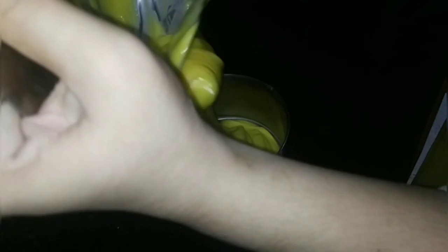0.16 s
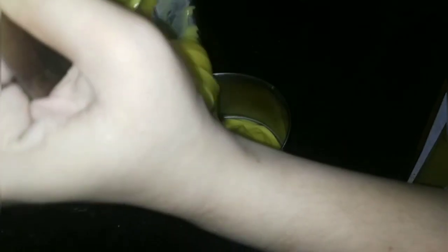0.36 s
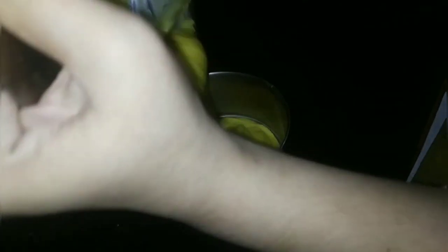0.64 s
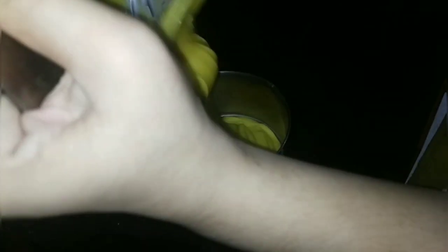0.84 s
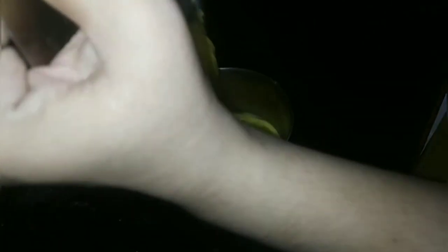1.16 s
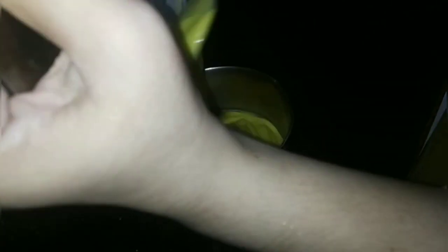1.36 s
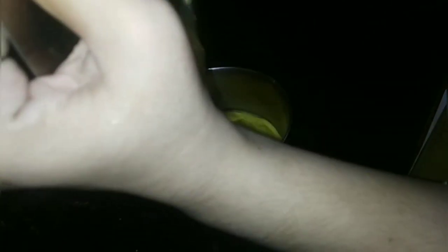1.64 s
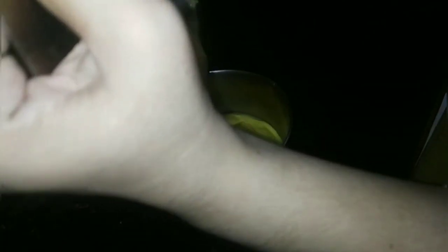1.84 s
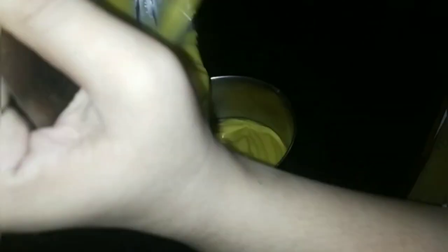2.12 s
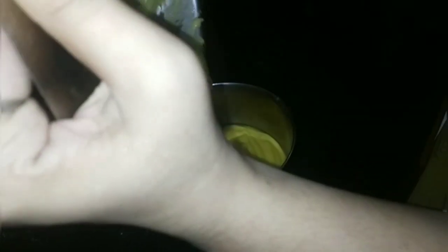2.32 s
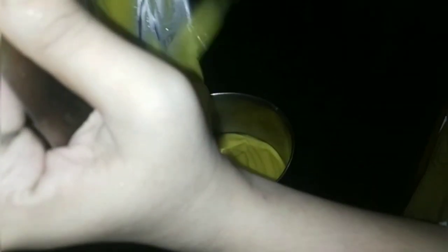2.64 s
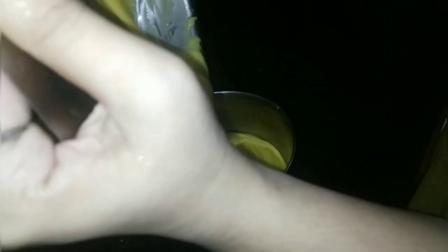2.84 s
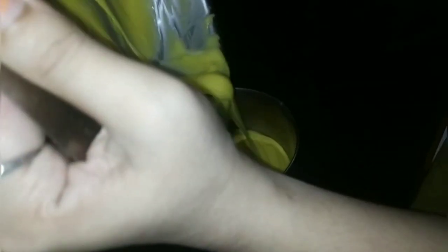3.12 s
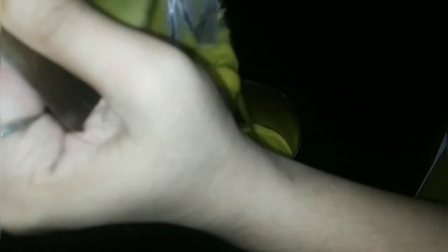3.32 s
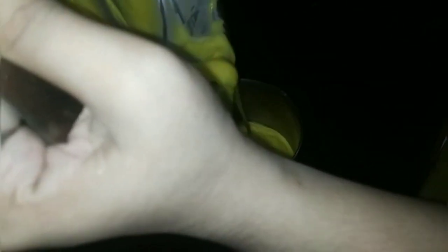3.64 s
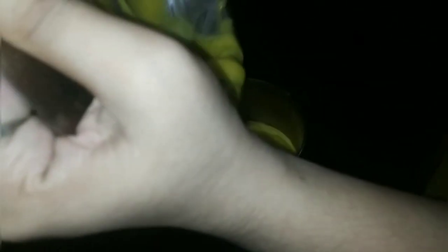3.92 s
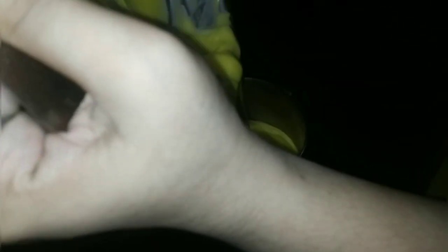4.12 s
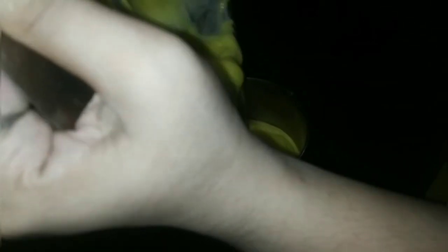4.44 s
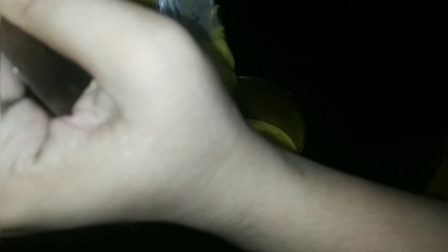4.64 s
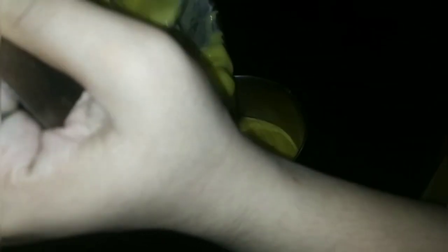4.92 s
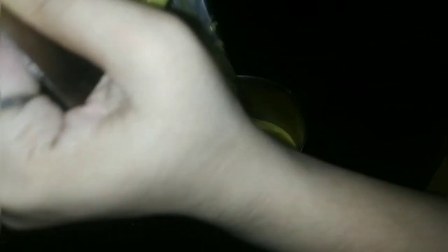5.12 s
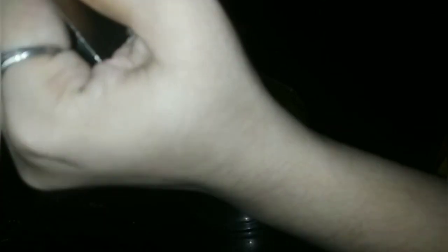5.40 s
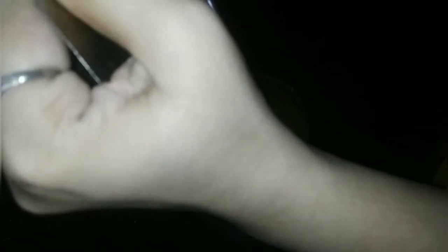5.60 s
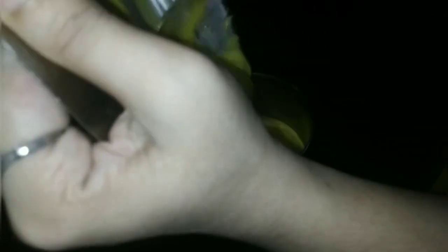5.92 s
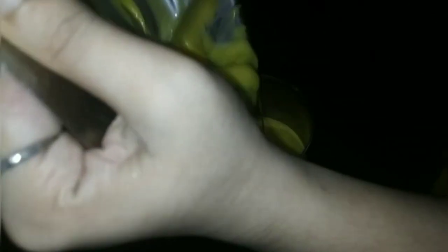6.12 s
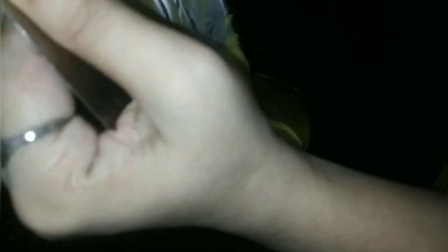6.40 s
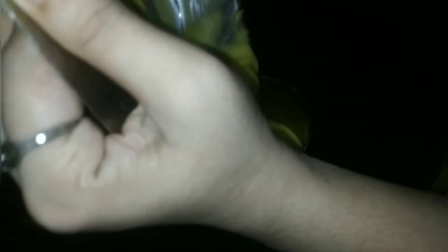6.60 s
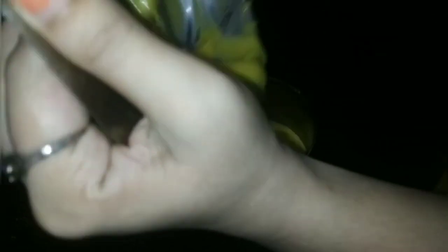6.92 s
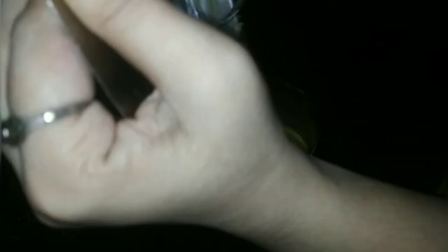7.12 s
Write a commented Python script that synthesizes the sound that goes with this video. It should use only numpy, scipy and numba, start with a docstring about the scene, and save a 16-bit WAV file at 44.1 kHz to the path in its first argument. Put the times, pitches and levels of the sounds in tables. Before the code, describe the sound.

A low, steady motor hum near 290 Hz runs throughout with a very faint thin whine, soft air noise and a low rumble, strongest at the start and again around 3.6 seconds before fading. Close up, a spatula touches a glass container dully at 0.1 and makes a short scrape. A hard, bright rim knock at 0.74 leaves the glass ringing briefly; soft scrapes follow at 0.8, 1.4 and 2.1. Another hard knock rings at 2.6, then a faint long scrape. From 3.2 to 3.7 stronger wet, gritty strokes hiss, ending in a soft pat. A knock lands at 4.0, with quick clinks and thuds from 4.2 to 5.1 among short scrapes. Longer tearing, sticky strokes run from 5.6 to 6.3. Damped knocks cluster around 6.6 to 6.8 with a firm scrape, then a final sharp clink at 7.1 and a last trailing scrape. Short kitchen echo.

```python
"""A motor hums and whines steadily in a small kitchen, over air noise and a low rumble that swells and fades.
A spatula soon knocks on a glass container, then scrapes out thick cake batter, stroke after stroke.
Each stroke is a wet hiss of tearing film over the container's rubbed resonances; knocks are damped rings.
The two hardest knocks leave the glass singing, and a few soft pats fall in between and after.
Motor tones are sines, rings are fading sines, and rubbing, hiss, air and rumble are shaped noise."""
import sys
import numpy as np
from scipy import signal
from scipy.fft import rfft, irfft
from scipy.io import wavfile
from numba import njit

SR = 44100
rng = np.random.default_rng(int(sys.argv[2]) if len(sys.argv) > 2 else 0)


def unload_wav(signal):
    """Save mono or channel-first audio to the path in sys.argv[1] as 16-bit WAV at rate SR, clipped to [-1, 1]."""
    wavfile.write(
        sys.argv[1],
        SR,
        np.round(np.clip(np.atleast_2d(signal).T, -1, 1) * 32767).astype(np.int16),
    )


N = 320166
TIME = np.arange(N) / SR  # seconds

# Steady tones of the motor shaft. Each row: multiple of the shaft rate, level in dB rms.
MOTOR_HUM = [(6, -44.5), (7, -67.5), (9, -68)]
# Magnetic whine of the rotor slots, sidebands one turn apart. Each row: pitch in Hz, level in dB rms.
SLOT_WHINE = [(2284.5, -76.5), (2333, -75), (2381.5, -80.5), (2430.4, -73), (2479, -65), (2527.6, -84)]
SHAFT_HZ = 48.58  # turns per second

# Colour of the air noise. Each row: frequency in Hz, level in dB per Hz.
AIR_COLOUR = [(20, -81), (50, -85.5), (100, -92), (160, -99), (270, -85), (450, -87.5), (620, -94.5),
              (900, -96), (1250, -99), (2000, -100), (2450, -119.5), (3000, -111), (3700, -110),
              (4800, -119), (6500, -120), (9000, -131), (13000, -137)]
# Swells of the low rumble. Each row: time in seconds, level in dB before one overall lift.
RUMBLE_SWELLS = [(0.0, -55), (0.36, -66), (1.21, -61.5), (1.92, -63.5), (3.58, -53.5), (4.85, -74),
                 (7.04, -74), (7.26, -80)]
# Colour of the rumble. Each row: frequency in Hz, relative level in dB per Hz.
RUMBLE_COLOUR = [(30, -6.5), (60, -7.5), (76, -8), (89, 11.5), (103, -1.5), (119, 1), (142, -7), (165, 0.5),
                 (200, -10.5), (400, -56.5)]

# Single tones set off by the hard edge of the blade. Each row: time in seconds, level in dB, pitch in Hz.
EDGE_PINGS = [(0.071, -38.5, 1179), (0.741, -36, 2630), (2.594, -39, 2700), (2.594, -32, 1570),
              (3.986, -26.5, 2620), (4.21, -31.5, 1583), (4.864, -28, 2346), (4.864, -34.5, 1138),
              (5.647, -28, 1575), (6.592, -26, 658), (6.592, -30, 1592), (7.115, -28, 1185),
              (7.114, -29, 1510)]
PING_T60 = 0.071  # seconds to fade by 60 dB

# Knocks of the spatula. Each row: time in seconds, spot on the container, basic level in dB,
# hardness in dB per octave, level of the contact tick in dB.
SPATULA_KNOCKS = [(0.072, "shoulder", -48, -2, -61), (0.74, "rim", -30.5, 0.1, -54),
                  (2.593, "rim", -31, 0.3, -46), (3.986, "shoulder", -37.5, 0.9, -49.5),
                  (4.195, "shoulder", -46.5, 0.7, -68), (4.21, "rim", -39.5, 1.5, -67),
                  (4.425, "shoulder", -40, 0.3, -59.5), (4.563, "bottom", -34.5, 0, -52),
                  (4.863, "wall", -34.5, 1, -57), (5.092, "wall", -46, 0, -78),
                  (5.538, "wall", -40, 1, -75), (5.646, "wall", -42, 4.5, -57),
                  (6.591, "wall", -43.5, 2, -55), (6.691, "bottom", -37.5, -2.3, -56),
                  (6.773, "wall", -42.5, -0.7, -72), (7.114, "shoulder", -40, 3, -47)]
# The hand-held container's ringing tones, one list per family from thud to clink.
# Each row: pitch in Hz, relative level in dB when knocked, time to fade by 60 dB in seconds.
CONTAINER_MODES = [
    [(258.5, 0, 0.049)],
    [(317.4, -3.5, 0.091)],
    [(483, -1.5, 0.059), (636, 9.5, 0.02), (716.4, 2, 0.044)],
    [(854, 0, 0.031), (944, -1, 0.051), (1003, -26, 0.069)],
    [(1150, 0.5, 0.041), (1181, -1, 0.031), (1333, -5, 0.038)],
    [(1454, 1.5, 0.032), (1575, -2, 0.065), (1685, -1.5, 0.075), (1877, -2, 0.044)],
    [(2094, -5, 0.022), (2248, 4, 0.034), (2446, 4.5, .028), (2683, -1, 0.019)],
]
# How strongly a knock at each spot wakes the families. Each row: one level in dB per family, thud to clink.
SPOT_LEVELS = {"rim": (-9.5, -17, -6.5, 1, -20, -10.5, -10), "shoulder": (-2, -5, 1, -1.5, -4, -6, -5),
               "wall": (-26, 4.5, -4, -24.5, -5, -5.5, -7.5),
               "bottom": (-30, -13, -0.5, -1, -8.5, -27, -13)}
# Colour of the contact tick. Each row: frequency in Hz, relative level in dB per Hz.
TICK_COLOUR = [(1500, -15.5), (2900, -5), (3600, -0.5), (5700, 8), (7500, 0), (9500, -2.5), (13000, -8),
               (15000, -19)]
PIVOT_HZ = 800  # hardness leaves the level unchanged at this pitch

# Strokes: pressure swells to its firmest moment, then eases, while the blade's resonance slides.
# Each row: start, firmest moment and end in seconds, swell in dB,
# levels of low rubbing, high rubbing and wet hiss in dB before trims, share of bright tearing from 0 to 1,
# blade resonance in Hz at the start and at the end, air gap resonance in Hz when firmest.
SPATULA_STROKES = [(0.139, 0.23, 0.24, 4, -54, -57, -67.5, .5, 1960, 2000, 5520),
                   (0.759, 0.80, 0.91, 9.5, -57, -59.5, -71, .4, 2030, 2010, 5500),
                   (1.33, 1.44, 1.556, 12.5, -58, -60.5, -68, 0.4, 2020, 1990, 5500),
                   (2.004, 2.06, 2.15, 20, -55.5, -56.5, -58, .6, 2020, 2000, 5530),
                   (2.108, 2.16, 2.38, 14, -59, -61.5, -73, 0.4, 2000, 1955, 5370),
                   (2.644, 2.77, 3.08, 6, -61, -64.5, -79, 0.3, 1990, 2020, 5400),
                   (3.194, 3.34, 3.38, 7, -53.5, -55.5, -64.5, 0.2, 2040, 1940, 5320),
                   (3.378, 3.43, 3.576, 6, -54, -51, -55.5, 0.8, 2350, 2180, 5530),
                   (3.529, 3.643, 3.68, 4, -47.5, -45, -52, .5, 2020, 1860, 5630),
                   (4.012, 4.035, 4.045, 3, -54, -53, -58, .7, 2170, 2140, 5320),
                   (4.063, 4.072, 4.185, 2.5, -54, -54.5, -52.5, 1, 2100, 1900, 5750),
                   (4.491, 4.55, 4.63, 3, -47, -44, -50.5, 0.4, 1780, 2030, 5650),
                   (4.634, 4.66, 4.88, 12, -57, -52.5, -66, 0, 2300, 2080, 4840),
                   (4.938, 4.99, 5.08, 5, -50, -53.5, -51, .75, 2000, 1860, 5460),
                   (5.343, 5.37, 5.51, 6.5, -74, -73, -76, 0, 1790, 1690, 5300),
                   (5.618, 5.78, 5.91, 7, -55, -49.5, -57.5, 0.8, 1530, 1630, 5250),
                   (5.87, 6.04, 6.14, 6.5, -55, -50.5, -52, 1, 1850, 1585, 6200),
                   (6.144, 6.19, 6.31, 8.5, -56.5, -52.5, -58.5, .9, 2035, 2270, 5860),
                   (6.628, 6.669, 6.776, 5, -47, -52.5, -48.5, 0.78, 1690, 1384, 6080),
                   (7.005, 7.014, 7.02, 6, -52, -68, -75.5, .4, 1500, 1490, 5360),
                   (7.043, 7.097, 7.115, 2, -68, -63, -59, .3, 1520, 1500, 5300),
                   (7.161, 7.204, 7.5, 0.5, -51.5, -53, -59, 0.3, 1510, 1610, 5110)]
# Faint steady rubbing and hiss beneath all strokes, keeping the levels finite.
# One row: levels of low rubbing, high rubbing and wet hiss in dB before trims.
FLOOR_LEVELS = (-67, -73.5, -89.5)
# Colours of low rubbing, high rubbing and hiss. Each row: frequency in Hz, relative level in dB per Hz.
LOW_RUB_COLOUR = [(200, -28.5), (330, -2.5), (520, -2), (680, 0.5), (790, 11.5), (920, 1), (1150, -6.5),
                  (1400, -25), (2000, -46)]
HIGH_RUB_COLOUR = [(800, -28.5), (1250, -7), (1570, -1.5), (1950, -6), (2250, -1), (2600, 1), (3100, -7),
                   (4200, -14), (8000, -51)]
HISS_COLOUR = [(1200, -22), (2600, -2), (3500, -16.5), (4600, 3.5), (5800, 4.5), (7400, 1), (9200, 3.5),
               (10400, 0), (12000, -1), (13000, 1)]
RUB_FOLLOWS = 0.93  # share of the hiss's swing in dB that the rubbing follows
ATTACK_DB_PER_S, RELEASE_DB_PER_S = 701.5, 479  # how fast the blade lands and lifts
GAP_HZ_PER_DB = 111  # pressure narrows the air gap under the blade, so its resonance rises

# The two hardest knocks, which leave the glass singing. Each row: time in seconds, level in dB.
SINGING_KNOCKS = [(.740, -41), (2.593, -40)]
# Tones of the singing glass. Each row: pitch in Hz, relative level in dB, time to fade by 60 dB in seconds.
GLASS_TONES = [(800, -5.5, 0.26), (840, -14.5, .35), (942, -9, 0.5), (1002, -1, 0.21), (1556, -10, 0.45),
               (1540, -7.5, 0.49), (1745, -12, 0.32), (2660, -6.5, .16), (2890, -18, .1)]
# Soft pats of blade and batter on the wall.
# Each row: time in seconds, level in dB, pitch in Hz, time to fade by 60 dB in seconds.
SOFT_PATS = [(1.420, -51.5, 880, 0.048), (3.019, -61.5, 1486, .08), (3.66, -44, 982.6, 0.096),
             (5.784, -56.5, 230, 0.04), (5.822, -53, 2076, 0.043)]
# How long the room's echo lasts. Each row: frequency in Hz, time to fade by 60 dB in seconds.
ECHO_T60 = [(200, 0.5), (900, 0.47), (2500, 0.57), (6000, 0.21), (12000, 0.11)]
CUTOFF_HZ = 13100  # top of the recorder's range


def from_db(db):
    """Turn decibels into a plain factor."""
    return 10 ** (np.asarray(db) / 20)


def rms_one(x):
    """Scale a sound to an rms level of 1."""
    return x / np.sqrt(np.mean(x ** 2) + 1e-20)


def at_hz(points, hz):
    """Read a table on a log-frequency axis."""
    f, value = np.transpose(points)
    return np.interp(np.log(np.maximum(hz, 1)), np.log(f), value)


def colour(x, spectrum):
    """Give a noise the stated spectrum."""
    n = x.shape[-1]
    gain = from_db(at_hz(spectrum, np.fft.rfftfreq(n, 1 / SR)))
    return irfft(rfft(x) * gain, n)


def tilted(spectrum, db_per_octave):
    """Tilt a spectrum to make it brighter or duller."""
    return [(hz, db + db_per_octave * np.log2(hz)) for hz, db in spectrum]


def drift(rate):
    """Random wandering with rms 1, changing course `rate` times a second."""
    knots = rng.standard_normal(4096)
    return rms_one(np.interp(TIME * rate, np.arange(len(knots)), knots))


def band(x, low_hz, high_hz):
    """Keep the part of a sound between two frequencies."""
    return signal.sosfilt(signal.butter(2, [low_hz, high_hz], "band", fs=SR, output="sos"), x)


def add(track, s, sound):
    """Lay a sound into the track at time s."""
    at = int(s * SR)
    track[at:at + len(sound)] += sound[:N - at]


def ring(hz, t60, t):
    """A sine that fades by 60 dB in t60 seconds."""
    return np.sin(2 * np.pi * hz * t) * from_db(-60 * t / t60)


def blow(x, db):
    """Scale a short sound so that its energy, spread over 20 ms, has this level."""
    return from_db(db) * x * np.sqrt(.02 * SR / np.sum(x ** 2))


@njit
def sweep(x, angle, radius):
    """A two-pole resonance whose centre moves."""
    y = np.zeros(len(x))
    for i in range(2, len(x)):
        feedback = 2 * radius * np.cos(angle[i]) * y[i - 1] - radius * radius * y[i - 2]
        y[i] = x[i] - x[i - 2] + feedback
    return y


def resonate(x, centre_hz, width_hz):
    """Pass a sound through a moving resonance and bring it to rms 1."""
    return rms_one(sweep(x, 2 * np.pi * centre_hz / SR, np.exp(-np.pi * width_hz / SR)))


def motor(throb_db=1.52):
    """Harmonics of the shaft and a thin slot whine share one nearly constant speed."""
    turns = 2 * np.pi * np.cumsum(1 + .0003 * drift(3)) / SR
    hum = sum(from_db(db) * np.sin(k * SHAFT_HZ * turns) for k, db in MOTOR_HUM)
    whine = sum(from_db(db + .5 * drift(2.7)) * np.sin(hz * turns) for hz, db in SLOT_WHINE)
    return np.sqrt(2) * (hum * from_db(throb_db * drift(7.9)) + whine)


def air_noise():
    """Steady noise with a known level in each Hz."""
    return colour(rng.standard_normal(N) * np.sqrt(SR / 2), AIR_COLOUR)


def rumble(lift_db=2.0):
    """Low noise that swells and fades."""
    s, db = np.transpose(RUMBLE_SWELLS)
    level_db = np.interp(TIME, s, db) + lift_db
    return from_db(level_db) * rms_one(colour(rng.standard_normal(N), RUMBLE_COLOUR))


def wide_treble(hiss_db, hiss_side_db=-6.0, air_side_db=-20.0, tilt_db_per_octave=1.0):
    """Wide treble: independent noise above 3.4 kHz, opposite in left and right."""
    hiss = rms_one(colour(rng.standard_normal(N), tilted(HISS_COLOUR, tilt_db_per_octave)))
    both = from_db(hiss_db + hiss_side_db) * hiss + from_db(air_side_db) * air_noise()
    side = signal.sosfilt(signal.ellip(10, .5, 90, 3400, "high", fs=SR, output="sos"), both)
    return side * np.array([[1], [-1]])


def edge_pings():
    """The hard edge of the blade makes single tones ping out."""
    out, t = np.zeros(N), TIME[:SR]
    for s, db, hz in EDGE_PINGS:
        add(out, s, from_db(db) * ring(hz, PING_T60, t))
    return out


def knocks(tick_t60=0.02, tick_rise_s=0.00083, rattle=0.44, rattle_t60=0.039):
    """A sharp tick and a ring that hand and batter damp at once, with a little rattle of the blade."""
    out, t = np.zeros(N), TIME[:SR // 5]
    for s, spot, knock_db, hardness, contact_db in SPATULA_KNOCKS:
        for family, spot_db in zip(CONTAINER_MODES, SPOT_LEVELS[spot]):
            low_hz, high_hz = family[0][0], family[-1][0]
            octaves = np.log2(np.sqrt(low_hz * high_hz) / PIVOT_HZ)
            rings = np.zeros(len(t))
            for k, (hz, level, t60) in enumerate(family):
                sign = (-1) ** (k + 1)
                rings += sign * from_db(level + 2 * rng.normal()) * ring(hz, t60, t)
            # keep low-frequency spill of the abrupt sine starts out of the rings
            spill_cut = signal.butter(2, low_hz / np.sqrt(2), "high", fs=SR, output="sos")
            rings = signal.sosfilt(spill_cut, rings)
            burst = rng.standard_normal(len(t)) * from_db(-60 * t / rattle_t60)
            chatter = band(burst, .85 * low_hz, 1.15 * high_hz)
            body = blow(rings, 0) + rattle * blow(chatter, 0)
            add(out, s, blow(body, knock_db + spot_db + hardness * octaves))
        tick_shape = from_db(-60 * t / tick_t60) * (1 - np.exp(-t / tick_rise_s))
        tick = colour(rng.standard_normal(len(t)), TICK_COLOUR) * tick_shape
        add(out, s, blow(tick, contact_db))
    return out


def strokes():
    """Pressure sets levels (dB) and gap resonance (Hz); each stroke brings its tearing share and blade slide."""
    power = from_db(FLOOR_LEVELS)[:, None] ** 2 * np.ones(N)
    weight, tearing, blade_hz, gap_hz = 0, 0, 0, 0
    for (start, firmest, end, swell_db, low_db, high_db, hiss_db, tear,
         from_hz, to_hz, firm_gap_hz) in SPATULA_STROKES:
        pressure_db = np.interp(TIME, [start, firmest, end], [-swell_db, 0, -swell_db])
        landing_db = ATTACK_DB_PER_S * np.maximum(start - TIME, 0)
        lifting_db = RELEASE_DB_PER_S * np.maximum(TIME - end, 0)
        contact = from_db(np.maximum(pressure_db - landing_db - lifting_db, -120))
        rub, hiss = contact ** RUB_FOLLOWS, from_db(hiss_db) * contact
        power += np.array([from_db(low_db) * rub, from_db(high_db) * rub, hiss]) ** 2
        # where strokes overlap, the stronger one counts for more
        weight = weight + contact
        tearing = tearing + np.clip(tear, 0, 1) * hiss ** 2
        blade_hz = blade_hz + contact * np.interp(TIME, [start, end], [from_hz, to_hz])
        gap_hz = gap_hz + contact * (firm_gap_hz + GAP_HZ_PER_DB * pressure_db)
    return *(10 * np.log10(power)), tearing / power[2], blade_hz / weight, gap_hz / weight


def slips(per_s, spread_db, smooth):
    """Tiny random stick-slip clicks of uneven size over smooth friction noise."""
    sizes = from_db(spread_db * np.minimum(rng.exponential(1, N), 4)) * rng.choice([-1, 1], N)
    clicks = rms_one(sizes * (rng.random(N) < per_s / SR))
    return rms_one(clicks + smooth * rng.standard_normal(N))


def rubbing(low_db, high_db, blade_hz, low_trim_db=-4, resonant=0.47, blade_share=0.96, blade_width_hz=260):
    """The blade judders along the wall, waking the container's modes and its own shifting resonance."""
    friction = slips(per_s=700, spread_db=1.5, smooth=0.41) * from_db(2 * drift(70))
    body = np.zeros(SR // 8)
    for family in CONTAINER_MODES:
        for hz, _, t60 in family:  # all modes equally strong here
            body += rng.choice([-1, 1]) * ring(hz, t60, TIME[:SR // 8])
    wall = friction + resonant * rms_one(signal.fftconvolve(friction, body)[:N])
    lower = rms_one(colour(wall, LOW_RUB_COLOUR))
    upper = rms_one(colour(wall, HIGH_RUB_COLOUR))
    blade_slips = colour(slips(per_s=900, spread_db=4.5, smooth=0.47), HIGH_RUB_COLOUR)
    blade = resonate(blade_slips, blade_hz * (1 + 0.02 * drift(35)), blade_width_hz)
    high = rms_one(upper + blade_share * blade)
    return from_db(low_db + low_trim_db) * lower + from_db(high_db) * high


def wet_hiss(hiss_db, tearing, gap_hz, trim_db=-0.1, patchy_db=4.0, flutter_db=2.37,
             whistle_width_hz=170, whistle=.38, tear_tilt_db=1.5):
    """The batter film tears in tiny pops; air gaps under the blade add thin wandering resonances."""
    pops = [slips(per_s=4000, spread_db=2.5, smooth=0.35) for _ in range(2)]
    patches, edges = np.zeros(N), np.geomspace(1800, 15000, 13)
    for k, (low, high) in enumerate(zip(edges, edges[1:])):
        patches += from_db(patchy_db * drift(22)) * band(pops[k % 2], low, high)
    bright = rms_one(colour(patches, tilted(HISS_COLOUR, tear_tilt_db)))
    gaps = np.zeros(N)
    for ratio in (.88, 1.04, 1.25, 1.68):
        centre_hz = ratio * gap_hz * (1 + .05 * drift(16))
        gaps += resonate(rng.standard_normal(N), centre_hz, whistle_width_hz) * from_db(5 * drift(25))
    # where the film slides rather than tears, it is duller
    sliding = rms_one(colour(rng.standard_normal(N), HISS_COLOUR))
    dull = rms_one(signal.sosfilt(signal.butter(2, 6500, fs=SR, output="sos"), sliding))
    film = np.sqrt(tearing) * bright + np.sqrt(1 - tearing) * dull
    wet = rms_one(film + whistle * rms_one(colour(gaps, HISS_COLOUR)))
    return from_db(hiss_db + trim_db + flutter_db * drift(70)) * wet


def singing_glass():
    """The glass rings long and faintly when the spatula bounces clear."""
    out, t = np.zeros(N), TIME[:SR]
    for s, db in SINGING_KNOCKS:
        add(out, s, sum(from_db(db + level) * ring(hz, t60, t) for hz, level, t60 in GLASS_TONES))
    return out


def pats(splat=0.091):
    """A cushioned touch: one dull ring and a short splat around it."""
    out, t = np.zeros(N), TIME[:SR // 5]
    for s, db, hz, t60 in SOFT_PATS:
        noise = band(rng.standard_normal(len(t)), hz / 2, hz * 2) * from_db(-60 * t / t60)
        add(out, s, blow(blow(ring(hz, t60, t), 0) + splat * blow(noise, 0), db))
    return out


def kitchen(x, gap_s=0.0028):
    """Dense reflections that die away band by band, with a total energy of 1."""
    t, edges = TIME[:SR * 3 // 4], np.geomspace(120, 15000, 8)
    tail = np.zeros(len(t))
    for low, high in zip(edges, edges[1:]):
        t60 = at_hz(ECHO_T60, np.sqrt(low * high))
        tail += band(rng.standard_normal(len(t)), low, high) * from_db(-60 * t / t60)
    tail = tail * np.clip(t / gap_s - 1, 0, 1)  # silent for one gap, then rising over another
    return signal.fftconvolve(x, tail / np.sqrt(np.sum(tail ** 2)))[:N]


def scene(knock_room_db=-13.5, scrape_room_db=-15.5):
    """Knocks and strokes close by, their echo in the kitchen, the motor, air and rumble behind."""
    low_db, high_db, hiss_db, tearing, blade_hz, gap_hz = strokes()
    hits = knocks() + pats()
    scrape = rubbing(low_db, high_db, blade_hz) + wet_hiss(hiss_db, tearing, gap_hz)
    echo = kitchen(from_db(knock_room_db) * hits + from_db(scrape_room_db) * scrape)
    behind = motor() + air_noise() + rumble()
    centre = behind + hits + edge_pings() + singing_glass() + scrape + echo
    return centre + wide_treble(hiss_db)


def record(dry):
    """The recorder has a narrow dip in the high treble and cuts the top steeply."""
    dip = signal.butter(1, [10450, 11600], "bandstop", fs=SR, output="sos")
    top = signal.ellip(10, .3, 70, CUTOFF_HZ, fs=SR, output="sos")
    return signal.sosfilt(np.vstack([dip, dip, top]), dry)


dry = scene()
out = record(dry)
unload_wav(out)
```